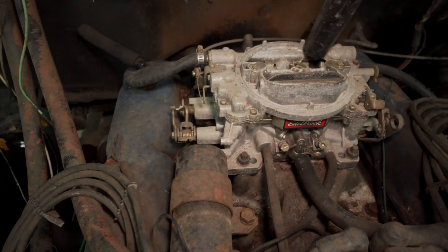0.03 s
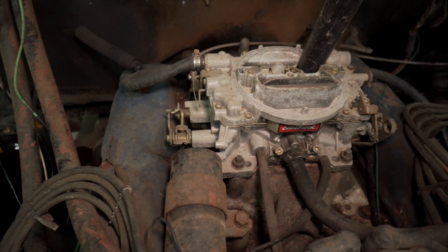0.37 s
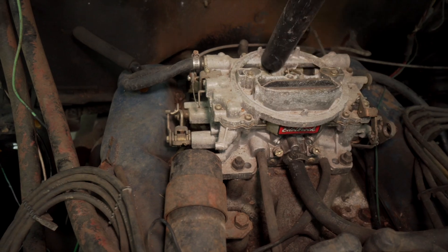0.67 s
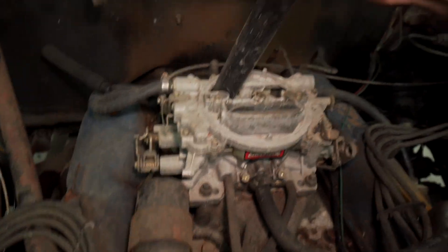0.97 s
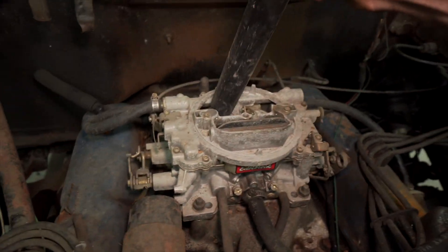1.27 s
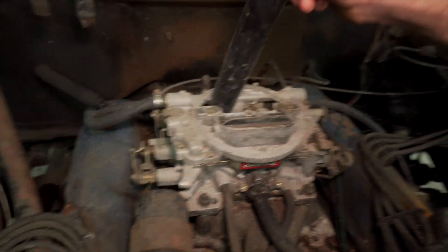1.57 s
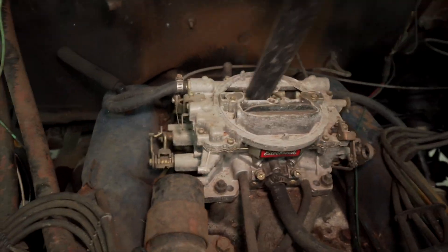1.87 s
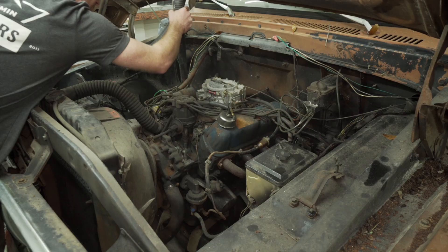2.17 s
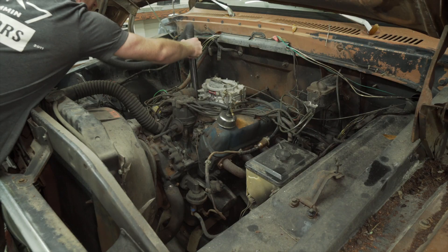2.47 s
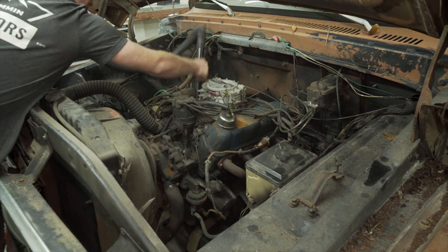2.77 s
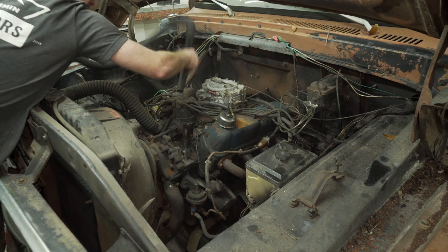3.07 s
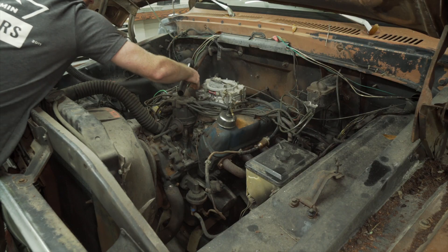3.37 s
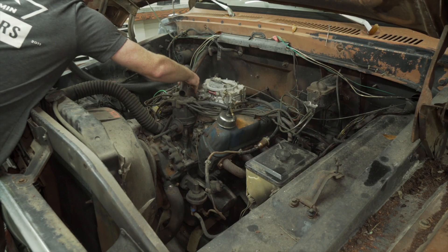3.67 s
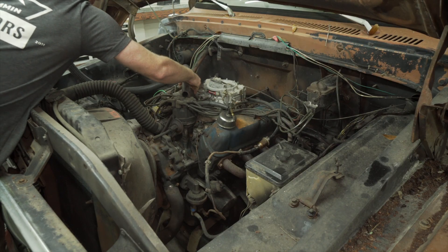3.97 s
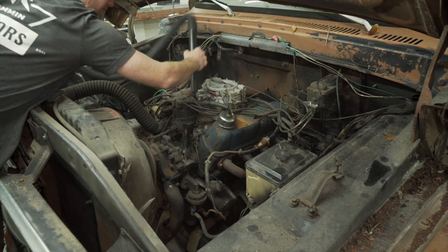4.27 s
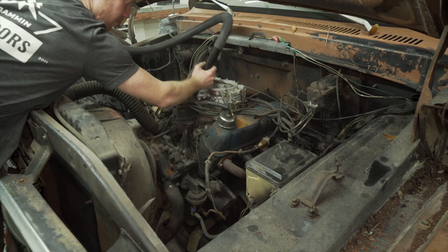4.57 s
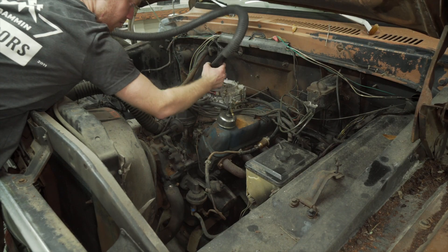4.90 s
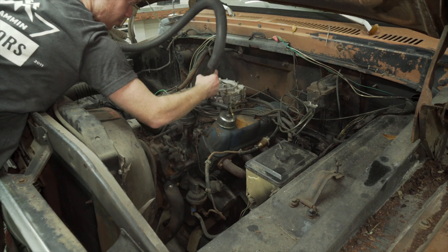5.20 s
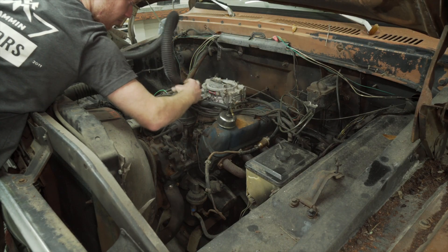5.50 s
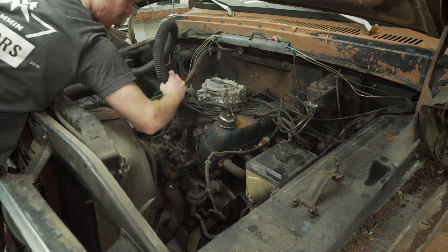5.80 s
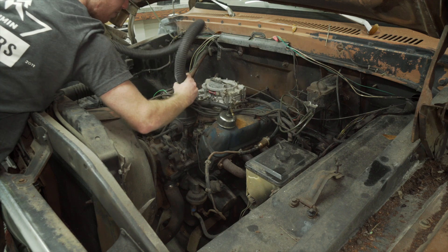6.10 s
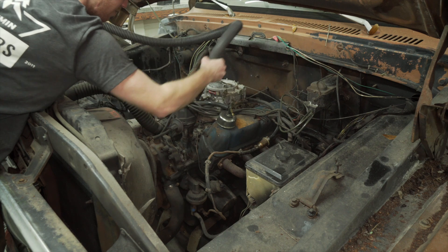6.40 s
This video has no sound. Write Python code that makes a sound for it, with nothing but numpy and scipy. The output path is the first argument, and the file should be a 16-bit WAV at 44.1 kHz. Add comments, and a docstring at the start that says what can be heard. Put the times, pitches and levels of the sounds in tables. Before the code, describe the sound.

A wet-dry vacuum runs without pause while its hose is worked over an old engine in a garage. At first the microphone is close to the nozzle, with a bright hiss and breathy whistles over the motor's hum and whine. After about two seconds the sound switches to farther back: a fuller roar, a hollow howl in the hose and a few soft bumps. The motor rises slightly in pitch twice as the nozzle chokes.

```python
"""A wet-dry vacuum runs while its hose is worked over an old engine in a garage.
The motor hums at its shaft rate, whines at its blade rates and speeds up when the nozzle is choked.
Turbulent air rushes in the hose and whistles at the rim, over a faint low drone.
Heard first close to the hissing nozzle, then from farther back, where the machine roars
and the hose howls and bumps about."""
import sys
import numpy as np
from scipy.fft import rfft, irfft
from scipy.io import wavfile

SR = 44100
rng = np.random.default_rng(int(sys.argv[2]) if len(sys.argv) > 2 else 0)


def inscribe(sig):
    """Save sig as 16-bit PCM at rate SR to the path in sys.argv[1].

    A 1-D sig is mono; a 2-D sig holds one channel per row.
    Samples are clipped to [-1, 1] before scaling.
    """
    pcm = np.round(np.clip(np.atleast_2d(sig).T, -1, 1) * 32767)
    wavfile.write(sys.argv[1], SR, pcm.astype(np.int16))


N = 293260
T = np.arange(N) / SR
HZ = np.maximum(np.arange(N // 2 + 1) * SR / N, 1)
FAR_SCENE_START_S = 2.203
FAR = np.clip((T - FAR_SCENE_START_S) / .004, 0, 1)   # 0 close, 1 far
LEFT_RIGHT = np.array([[1], [-1]])


def from_db(db):
    """Decibels to gain."""
    return 10 ** (np.asarray(db) / 20)


def unit_rms(x):
    """Scale to unit power."""
    return x / np.sqrt(np.mean(x ** 2) + 1e-20)


def over_time(rows):
    """Curve columns at every sample."""
    time_s, *columns = np.transpose(rows)
    return [np.interp(T, time_s, c) for c in columns]


def over_hz(rows):
    """Spectrum columns at every frequency."""
    freq_hz, *columns = np.transpose(rows)
    return np.array([np.interp(np.log(HZ), np.log(freq_hz), c) for c in columns])


def by_place(close, far):
    """One value beside the nozzle, another farther back."""
    return close * (1 - FAR) + far * FAR


def gate(start_s, end_s, fade_s):
    """Fade in around start_s, hold at 1, fade out around end_s."""
    return np.clip(.5 + np.minimum(T - start_s, end_s - T) / fade_s, 0, 1)


def drift(rate_hz):
    """Slow random motion, RMS 1."""
    return unit_rms(irfft(rfft(rng.standard_normal(N)) / (1 + (HZ / rate_hz) ** 2), N))


def pan(pan_db):
    """Stereo gains; positive leans left."""
    return from_db(LEFT_RIGHT * pan_db / 2)


def narrow_noise(pitch_hz, width_hz, pan_db):
    """Stereo noise ringing in one resonance; the pitch may move."""
    mid, side = [drift(width_hz * .8) + 1j * drift(width_hz * .8) for _ in range(2)]
    pair = mid + .5 * side * LEFT_RIGHT
    carrier = np.exp(2j * np.pi * np.cumsum(pitch_hz * np.ones(N)) / SR)
    return unit_rms((pair * carrier).real) * pan(pan_db)


# time_s, pitch_hz, level_db
DRONE_CURVE = [(0, 59.2, -51.5), (1.9, 60, -57), (2.19, 58.4, -46), (2.24, 58, -58), (2.6, 57, -63),
               (3.3, 53.9, -63), (4.0, 46.3, -60.5), (6.65, 45.8, -59.5)]
# harmonic, close_gain_db, far_gain_db
DRONE_PARTIALS = [(1, -26, -9), (2, 0, -2), (3, -22, -3)]


def drone(waver_db=2.8):
    """A faint low drone that sinks in pitch."""
    pitch_hz, level_db = over_time(DRONE_CURVE)
    turns = np.cumsum(pitch_hz * (1 + .00754 * drift(5.6))) / SR
    partials = np.zeros(N)
    for harmonic, close_db, far_db in DRONE_PARTIALS:
        gain = from_db(by_place(close_db, far_db) + waver_db * drift(8.7))
        partials += gain * np.sin(2 * np.pi * harmonic * turns)
    return np.sqrt(2) * from_db(level_db) * partials


# start_s, level_db, decay_s, pitch_hz
HOSE_BUMPS = [(2.424, -37, .04, 220), (2.53, -36, .04, 240), (2.988, -35, .022, 220),
              (3.045, -43, .03, 250), (4.362, -36, .025, 255), (4.415, -37, .02, 255)]


def hose_bumps(rise_s=.003, q=2.5):
    """The ribbed hose knocks and drags: low shudders that die at once."""
    out = np.zeros(N)
    for start_s, level_db, decay_s, pitch_hz in HOSE_BUMPS:
        age_s = np.maximum(T - start_s, 0)
        body = 1 / (1 + 1j * q * (HZ / pitch_hz - pitch_hz / HZ))
        shudder = unit_rms(irfft(rfft(rng.standard_normal(N)) * body, N))
        envelope = (1 - np.exp(-age_s / rise_s)) * np.exp(-age_s / decay_s)
        out += from_db(level_db) * shudder * envelope
    return out


# time_s, arch_fraction
HOSE_ARCH = [(2.2, 0.2), (2.6, 0), (3.4, 0.3), (3.9, 0.45), (4.3, 0.8), (4.6, 0.9), (5.0, 0.99),
             (5.4, 0.77), (6.0, 0.75), (6.65, 1)]
# pitch_hz, width_hz, lying_db, arched_db
HOSE_AIR_MODES = [(653, 33, -41.5, -53), (1310, 10, -67, -36.5), (2122, 32, -38, -49), (2415, 23, -42, -41),
                  (4757, 91, -38, -35)]


def hose_howl():
    """Air modes trade strength as the hose is raised into an arch; heard only from farther back."""
    arch, = over_time(HOSE_ARCH)
    out = np.zeros((2, N))
    for pitch_hz, width_hz, lying_db, arched_db in HOSE_AIR_MODES:
        level_db = lying_db + (arched_db - lying_db) * arch
        out += from_db(level_db) * narrow_noise(pitch_hz, width_hz, pan_db=6)
    return FAR * out


# start_s, end_s, start_hz, end_hz, width_hz, level_db
RIM_WHISTLES = [(.1, .95, 4700, 4710, 110, -35), (.55, 1.15, 5560, 5420, 170, -37),
                (1.17, 1.78, 5250, 5290, 100, -34.5), (1.25, 1.68, 6130, 6230, 180, -39),
                (1.7, 1.9, 4760, 4790, 65, -32.5), (1.69, 1.9, 5590, 5580, 150, -38),
                (1.95, 2.22, 4850, 4850, 140, -37), (2.0, 2.25, 5260, 5240, 130, -37),
                (4.86, 4.97, 5000, 5400, 900, -33)]


def nozzle_whistles():
    """Breathy whistles swell and fade as the gap between rim and an edge closes and opens."""
    out = np.zeros((2, N))
    for start_s, end_s, start_hz, end_hz, width_hz, level_db in RIM_WHISTLES:
        progress = np.clip((T - start_s) / (end_s - start_s), 0, 1)
        swell = np.sqrt(np.abs(np.sin(np.pi * progress)))
        pitch_hz = start_hz + (end_hz - start_hz) * progress
        out += from_db(level_db) * swell * narrow_noise(pitch_hz, width_hz, pan_db=10.5)
    return out


def metal_echoes(hiss, strength=.32, sway_s=.00006, count=5):
    """Engine bay reflections comb the hiss; the comb slides as the nozzle moves."""
    out = hiss.copy()
    for channel in range(2):
        for delay_s in rng.uniform(.002, .014, count):
            out[channel] += strength * np.interp(T - delay_s - sway_s * drift(.46), T, hiss[channel], left=0)
    return out / np.sqrt(1 + count * strength ** 2)


# start_s, end_s, roar_lift_db, edge_lift_db
NOZZLE_SKIMS = [(.14, .35, 0.5, 0.7), (.66, .77, 0, 2.5), (1.213, 1.36, 2, 1.9), (1.87, 2.0, 1.1, 0.5),
                (2.128, 2.227, 1.5, 2), (2.4, 2.623, 1.7, 0.7), (2.66, 2.878, -0.3, 1),
                (3.22, 4.096, -0.1, 1.3), (4.84, 4.938, 0.4, 3), (5.02, 5.2, -0.3, 2),
                (5.323, 5.48, .8, 1.5)]


def air_surges_db():
    """Roar and edge hiss gains: steady suction, surging where the nozzle skims a surface."""
    roar_db, edge_db = by_place(.07, -.63), by_place(-.9, -.5)
    for start_s, end_s, roar_lift_db, edge_lift_db in NOZZLE_SKIMS:
        skim = gate(start_s, end_s, fade_s=.075)
        roar_db += roar_lift_db * skim
        edge_db += edge_lift_db * skim
    return roar_db, edge_db


def turbulence(spectrum, resonances, correlation):
    """Stereo air noise shaped by the cavities it passes through."""
    lift_db = sum(db / (1 + (2 * (HZ - hz) / width_hz) ** 2) for hz, width_hz, db in resonances)
    alike = np.clip(over_hz(correlation)[0], -.999, .999)
    mid, side = rfft(rng.standard_normal((2, N)))
    pair = np.sqrt((1 + alike) / 2) * mid + np.sqrt((1 - alike) / 2) * side * LEFT_RIGHT
    return irfft(pair * from_db(over_hz(spectrum) + lift_db) * np.sqrt(SR / 2), N)


# freq_hz, left_db_per_hz, right_db_per_hz
CLOSE_AIR_SPECTRUM = [(30, -103.1, -103.2), (110, -84, -87), (202, -84, -85.5), (276, -69.5, -78),
                      (380, -90, -87), (515, -79, -70.5), (1590, -75.5, -73), (3290, -67, -68),
                      (4700, -58.5, -67.5), (6550, -58, -64), (7580, -69, -68.5), (10000, -69.5, -70),
                      (13000, -75.5, -73), (15500, -93, -74)]
FAR_AIR_SPECTRUM = [(30, -92, -92), (72, -89, -91), (130, -70, -70), (156, -79, -79.5), (251, -66.5, -68.5),
                    (452, -66, -72.5), (474, -63.5, -63), (800, -67, -68.5), (2080, -62, -63),
                    (3330, -60.5, -64), (6420, -60, -62.5), (8130, -66, -67), (9300, -65.5, -67.5),
                    (15500, -74.5, -74)]
# freq_hz, width_hz, lift_db
NOZZLE_RESONANCES = [(1160, 21, 10.5), (1365, 92, 11), (2370, 170, 7.5), (2770, 42, 8), (3540, 41, 7),
                     (4580, 410, 4.5), (5540, 570, 3.5), (8450, 414, 2)]
CANISTER_AND_BAY_RESONANCES = [(263.7, 4.2, 10), (678, 110, 5), (1003, 130, 2.5), (1281, 75, 9),
                               (1463, 52, 8.5), (2004, 40, 8), (2126, 41, 5.5), (2315, 150, 3.5),
                               (4060, 100, 4.5), (4535, 130, 4), (5890, 77, 4.5), (5780, 59, -0.5),
                               (8450, 150, 6)]
# freq_hz, left_right_correlation
CLOSE_AIR_CORRELATION = [(130, .995), (300, 1), (650, 0.8), (1400, -0.33), (3000, 0.02), (6500, 0.057),
                         (15000, 1)]
FAR_AIR_CORRELATION = [(130, .998), (300, 1), (650, 0.97), (1400, 0.78), (3000, 0.44), (7000, 0.35),
                       (15000, .3)]


def airflow(roar_hz=3500, edge_hz=8500, jet_share=.34, gust_db=1.0, tremble_db=1.05):
    """Roar in the hose, jet in the nozzle, fine hiss where the rim nears a surface."""
    close = turbulence(CLOSE_AIR_SPECTRUM, NOZZLE_RESONANCES, CLOSE_AIR_CORRELATION)
    far = turbulence(FAR_AIR_SPECTRUM, CANISTER_AND_BAY_RESONANCES, FAR_AIR_CORRELATION)
    air = by_place(close, far)
    roar_db, edge_db = air_surges_db()
    edge_db += tremble_db * drift(22)   # the rim gap trembles in the hand
    roar = irfft(rfft(air) / (1 + (HZ / roar_hz) ** 4), N)
    edge = irfft(rfft(air) / (1 + (edge_hz / HZ) ** 6), N)
    jet = air - roar - edge
    hiss = jet * from_db(jet_share * (roar_db + edge_db)) + edge * from_db(edge_db)
    return roar * from_db(roar_db + gust_db * drift(20)) + metal_echoes(hiss)


def tone(turns, level_db, pan_db, lead_rad, flutter):
    """A stereo tone; moving air and reflections flutter its strength and phase."""
    shared = drift(23) + 1j * drift(20)
    per_channel = np.array([drift(12) + 1j * drift(4.9) for _ in range(2)])
    carrier = np.exp(2j * np.pi * (turns + rng.random()) + .5j * LEFT_RIGHT * lead_rad)
    fluttering = carrier * (1 + flutter * (shared + per_channel))
    return from_db(level_db) * pan(pan_db) * unit_rms(fluttering.real)


# start_s, ramp_s, end_s, change_hz
NOZZLE_CHOKES = [(-1, .2, 2.2, 9.0), (2.43, .22, 2.94, 8.8), (4.02, .15, 4.45, 1.6),
                 (4.45, .14, 4.72, -2.6), (4.84, .37, 5.19, 10.0), (5.23, .43, 6.23, 1.4)]


def shaft_change_hz(settle_s=.32):
    """A choked nozzle unloads the fan and speeds it up; a wide open one slows it."""
    out = np.zeros(N)
    for start_s, ramp_s, end_s, change_hz in NOZZLE_CHOKES:
        ramp = np.clip((T - start_s) / ramp_s, 0, 1)
        settle = np.exp(-np.maximum(T - end_s, 0) / settle_s)
        out += change_hz * ramp * settle
    return out


# start_s, end_s, shaft_order, level_db
WHINE_FLARES = [(1.03, 2.2, 6, -43), (1.55, 2.12, 10, -42), (2.25, 2.45, 6, -32), (2.68, 2.8, 6, -38.5),
                (2.79, 2.97, 10, -34), (2.98, 3.24, 6, -33), (3.36, 3.55, 6, -34.5), (3.63, 4.3, 10, -37),
                (3.87, 4.03, 6, -37), (4.16, 4.48, 6, -37), (4.37, 4.53, 10, -32), (4.96, 5.08, 10, -34.5),
                (5.25, 5.42, 6, -33), (5.6, 6.3, 10, -35.2), (5.72, 6.2, 6, -32.5), (6.3, 6.7, 10, -31.7)]


def blade_whine(turns, order, rest_db, pan_db, lead_rad):
    """The fan blades whine at a multiple of the shaft rate, flaring while the path is clear."""
    flare_db = sum((level_db - rest_db) * gate(start_s, end_s, fade_s=.05)
                   for start_s, end_s, shaft_order, level_db in WHINE_FLARES if shaft_order == order)
    return tone(turns * order, rest_db + flare_db, pan_db, lead_rad, flutter=.17)


# arm and hose cross the hum's path: centre_s, half_width_s, change_db
HUM_SWELLS_AND_DIPS = [(1.39, .36, 2.5), (2.12, .07, -6), (2.81, .14, 4), (3.09, .09, -3.5),
                       (3.53, .18, 3.5), (4.35, .1, 2.5), (4.68, .2, -1.5), (5.15, .025, -12),
                       (5.33, .055, -14), (5.61, .09, -3.5), (6.0, .4, 2.2)]
# shaft_order, close_db, far_db
MOTOR_OVERTONES = [(2, -59, -57), (3, -69, -48.5), (12, -41.5, -47.5), (18, -56, -45), (24, -79, -68)]


def motor(free_hz=312.3, hum_loss_db_per_hz=.51):
    """Rotor imbalance hums once a turn, under two blade whines and weak overtones."""
    change_hz = shaft_change_hz()
    turns = np.cumsum((free_hz + change_hz) * (1 + .000494 * drift(18.6))) / SR
    swells_db = sum(change_db * np.exp(-((T - centre_s) / half_width_s) ** 2)
                    for centre_s, half_width_s, change_db in HUM_SWELLS_AND_DIPS)
    hum_db = by_place(-32.5, -31) - hum_loss_db_per_hz * change_hz + swells_db
    out = tone(turns, hum_db, pan_db=by_place(-1, .28), lead_rad=-.093, flutter=.091)
    out += blade_whine(turns, order=6, rest_db=by_place(-47.5, -44),
                       pan_db=by_place(1.9, 7.9), lead_rad=by_place(1.7, 1.18))
    out += blade_whine(turns, order=10, rest_db=by_place(-51, -40),
                       pan_db=by_place(3.1, 4.6), lead_rad=-.16)
    for order, close_db, far_db in MOTOR_OVERTONES:
        level_db = by_place(close_db, far_db)
        out += tone(turns * order, level_db, pan_db=10, lead_rad=by_place(-1.4, -.1), flutter=.31)
    return out


def scene():
    """Motor, air, hose and drone together."""
    return motor() + airflow() + nozzle_whistles() + hose_howl() + hose_bumps() + drone()


def record(dry):
    """Steep low-pass."""
    cutoff_hz = 15750
    return irfft(rfft(dry) / np.sqrt(1 + (HZ / cutoff_hz) ** 300), N)


dry = scene()
out = record(dry)
inscribe(out)
```